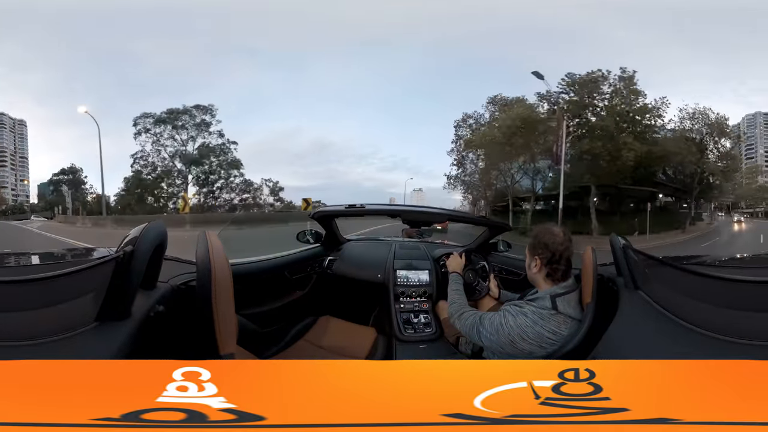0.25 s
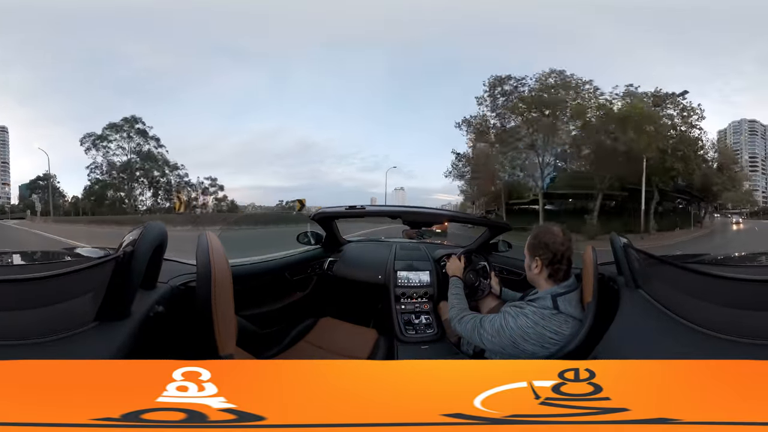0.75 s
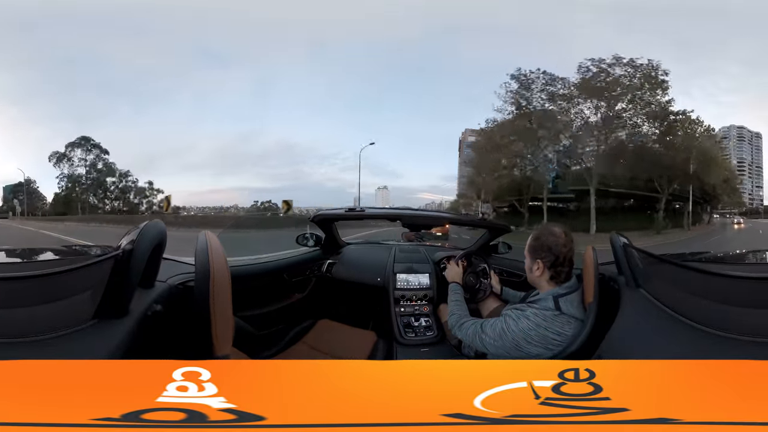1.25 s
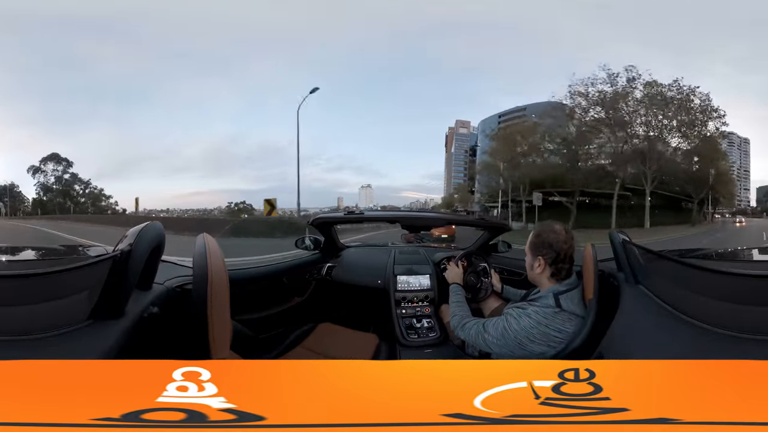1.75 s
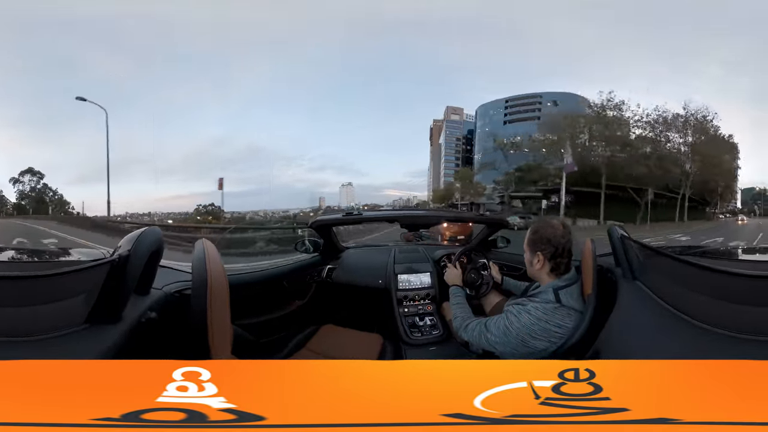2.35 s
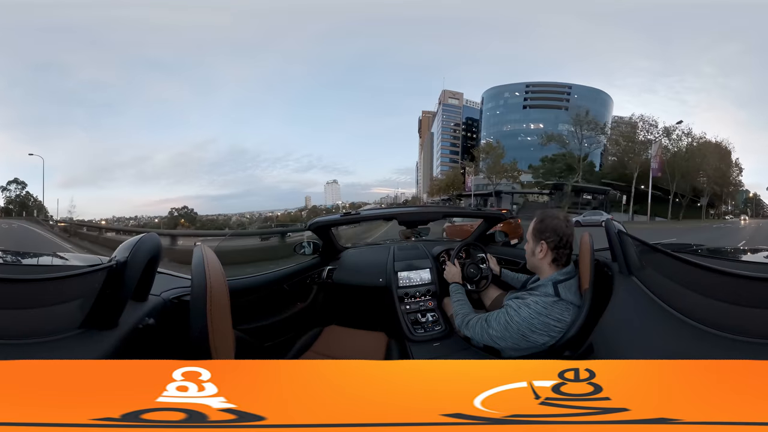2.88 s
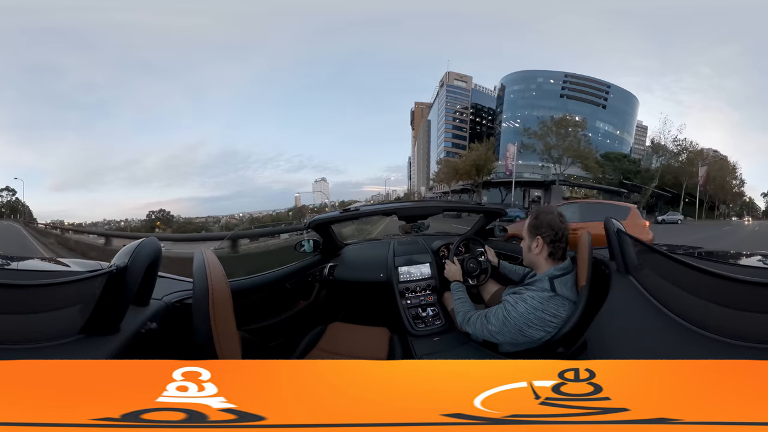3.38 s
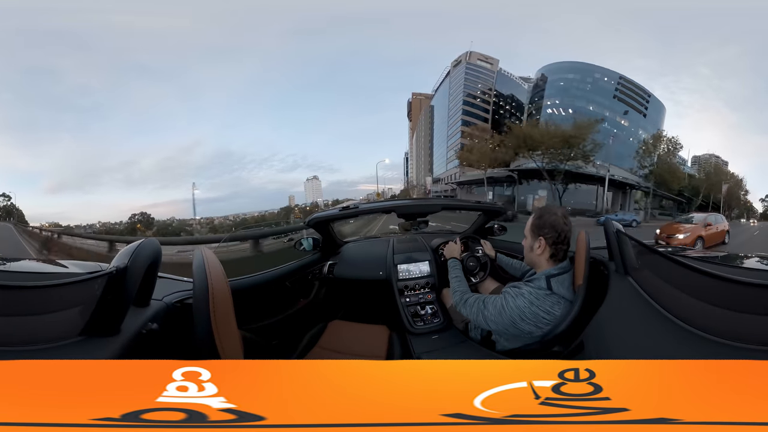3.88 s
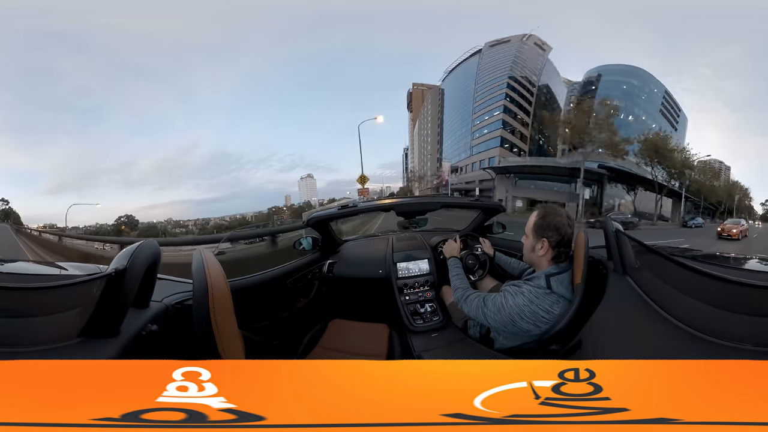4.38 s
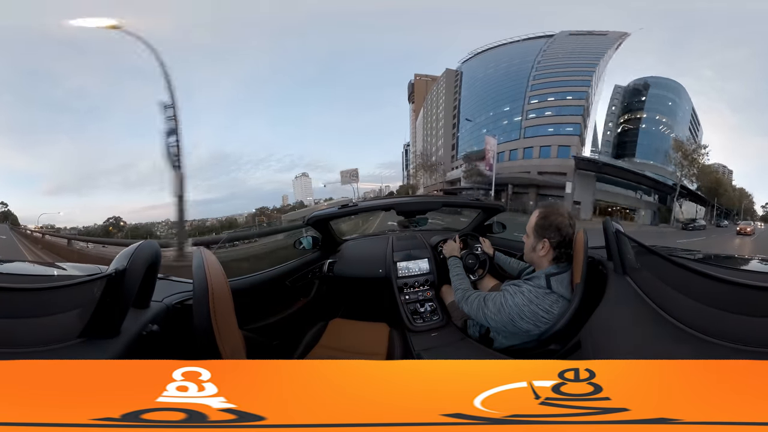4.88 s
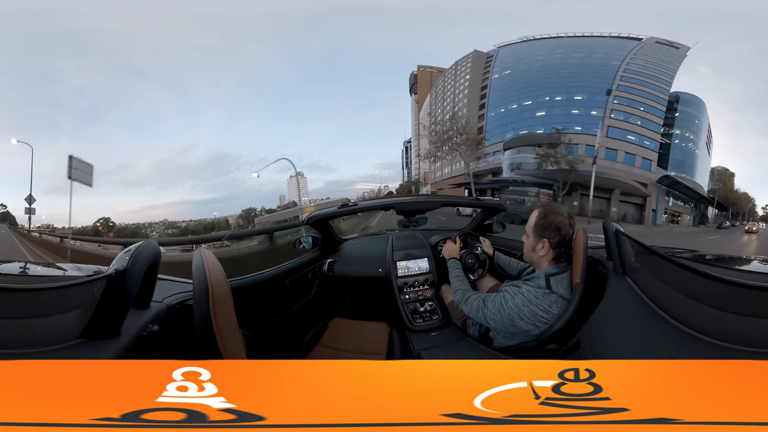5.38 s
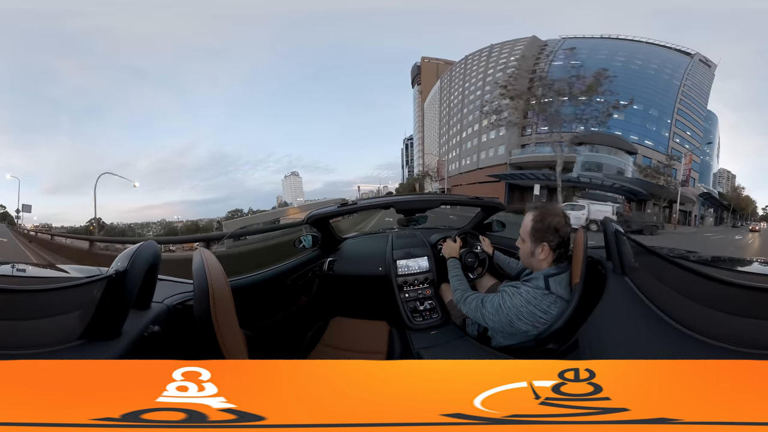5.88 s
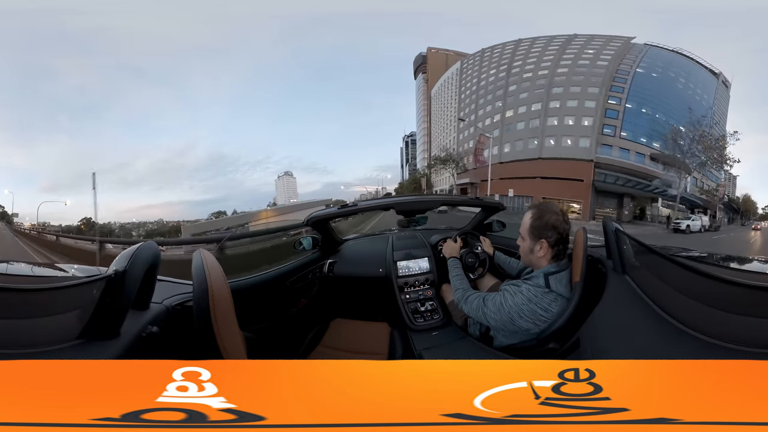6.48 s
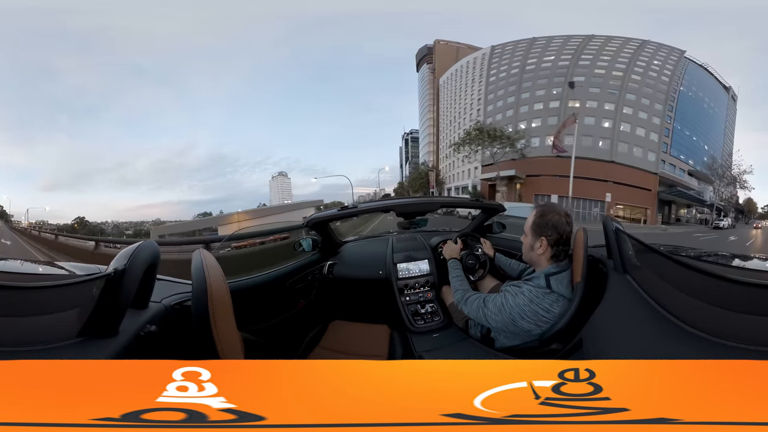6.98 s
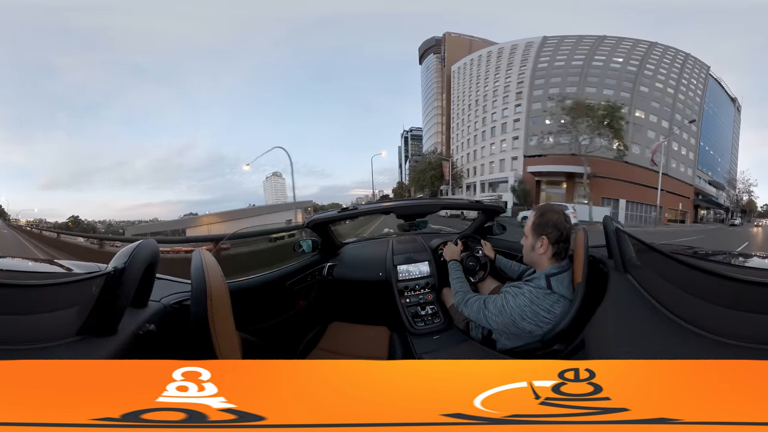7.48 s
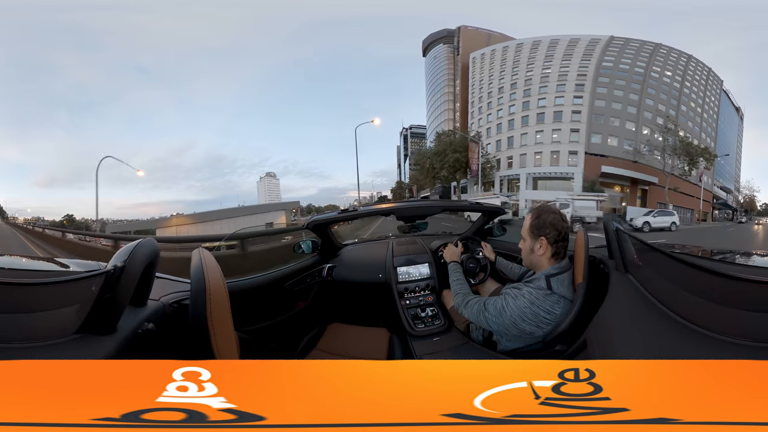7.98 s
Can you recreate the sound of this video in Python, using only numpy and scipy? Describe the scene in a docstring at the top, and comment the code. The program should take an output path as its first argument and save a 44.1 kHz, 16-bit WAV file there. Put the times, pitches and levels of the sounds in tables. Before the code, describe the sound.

An open-top V8 sports car eases off, pulls lightly, then hard with sharp exhaust cracks, lifts with dull pops, and coasts in buffeting wind.

```python
"""Wind buffets the microphone while a V8 roadster, top down, eases off, with thin cabin squeaks and ticks.
Then a light pull, a hard pull ending in sharp exhaust cracks, a lift with pops through an upshift, a long coast.
Engine: sines at firing orders, firing pulses ringing the pipe, and gas noise puffed by each firing.
Cracks and pops: impulses into exhaust resonances. Wind, tyres and body: shaped noise, the slow lumps clipping."""
import sys
import numpy as np
from scipy import signal
from scipy.fft import rfft, irfft, next_fast_len
from scipy.io import wavfile
from scipy.ndimage import uniform_filter1d, map_coordinates

SR = 44100
rng = np.random.default_rng(int(sys.argv[2]) if len(sys.argv) > 2 else 0)


def store_pcm(level_fs):
    """Save levels as 16-bit WAV."""
    pcm = np.round(np.clip(level_fs, -1, 1) * 32767).astype(np.int16)
    wavfile.write(sys.argv[1], SR, np.atleast_2d(pcm).T)


N = 363384

# engine speed: (time [s], firing rate [Hz])
FIRING_RATE = [(0, 140), (.3, 123.1), (.7, 117.6), (1.0, 124), (1.75, 129.7), (2.05, 139), (2.6, 152.4),
               (2.8, 159.9), (3.45, 181.5), (3.7, 188.2), (4.07, 187.3), (4.25, 173.4), (4.55, 140.7),
               (5.0, 138.2), (5.9, 125.9), (6.5, 117.6), (7.4, 108), (8.24, 102.9)]
# engine load: (time [s], firing tone [dB], pipe bark [dB], gas rasp before offsets [dB])
ENGINE_LOAD = [(0, -39, -36.5, -48), (.7, -44, -44, -60), (1.0, -26, -35.5, -49.5), (1.3, -24.5, -34, -41),
               (1.6, -27.5, -34.5, -43.5), (1.87, -36.5, -43, -59.5), (2.15, -25.5, -34, -40),
               (2.6, -23.5, -39.5, -33.5), (2.72, -22.5, -45, -27.5), (3.3, -21.5, -32, -26.5),
               (3.55, -20.5, -20.5, -20), (3.77, -18, -17, -21), (3.92, -23.5, -25.5, -51),
               (4.07, -27.5, -30, -67), (4.18, -38.5, -26.5, -57), (4.45, -39, -29, -60),
               (4.7, -28, -31.5, -53), (5.3, -32.5, -31, -52), (5.8, -33, -45.5, -52),
               (8.24, -24.5, -55, -51.5)]
# tones beside the firing tone: (time [s], 3/4 rate [dB], 5/4 rate [dB], 7/4 rate [dB], 2x rate [dB])
SIDE_TONES = [(0, -48, -50, -29, -22.5), (.2, -41, -59, -41, -39), (2.0, -42.5, -59, -48, -37.5),
              (2.25, -29.5, -50, -38, -36.5), (3.4, -32.5, -46, -36.5, -36.5), (3.7, -43, -40, -28, -25.5),
              (4.1, -46, -54, -55, -35.5), (4.45, -41, -42, -57, -34), (4.8, -31.5, -31.5, -53, -53),
              (5.7, -29, -51, -36, -40), (6.9, -36.5, -50, -43, -46), (8.24, -46, -53, -51, -42)]
# tailpipe pulse strength by cylinder in firing order, pulling: (relative level [dB])
PULLING_DB = [0, -1, -4, -3, -.5, -4, -2, -4]
# same, coasting: (relative level [dB])
COASTING_DB = [3.5, -5.5, -2, -7.5, 0, -1.5, -8, -3.5]
# cylinder bank in firing order: (bank [0 or 1])
BANK = [0, 1, 0, 0, 1, 0, 1, 1]
# exhaust resonances, bypass valve open: (centre [Hz], width [Hz], relative level [dB])
OPEN_PIPE = [(330, 9.3, -22.5), (467, 150, -1), (556.3, 23, 3.5), (656, 47, 3), (739, 40, 4)]
# exhaust resonances, bypass valve shut: (centre [Hz], width [Hz], relative level [dB])
SILENCER = [(191.4, 13, 3), (262, 190, -10), (456, 40, 2.5), (619, 65, 2.5), (895, 51, -4)]
# tailpipe tip resonances: (centre [Hz], width [Hz], relative level [dB])
TIPS = [(1600, 28, 11), (2190, 29, 1), (2370, 41, 0), (3350, 660, -2.5), (5510, 166, -6), (7500, 470, -40)]
# turbulent exhaust gas spectrum: (frequency [Hz], relative density [dB per Hz])
GAS_SPECTRUM = [(150, -39), (250, -38), (282, -23), (427, -9), (705, 2.5), (997, -4.5), (1340, -0.5),
                (2250, -8.5), (3010, -5.5), (4410, -14), (5520, -18.5), (7800, -25.5), (9110, -35.5),
                (12400, -38), (15600, -42)]
# crack strength by cylinder in firing order: (relative level [dB])
CRACKING_DB = [0, -3, -60, -60, -3, -60, -60, -60]
# unburnt fuel popping: (time [s], blow before pipe gain [dB], snap relative to blow [dB])
POPS = [(4.217, -16, -16), (4.25, -4.5, -8.5), (4.263, -3.5, -25), (4.292, -11, -22), (4.313, -11, -23),
        (4.327, -11, -25), (4.345, -6.5, -28), (4.366, -4.5, -24), (4.386, -16, -25), (4.42, -10, -13),
        (4.457, -11, -22), (4.477, -10.5, -13), (4.563, -19, -20), (4.599, -18, -20), (4.637, -17, -27),
        (4.694, -12, -15)]
# exhaust resonances under a pop: (centre [Hz], width [Hz], relative level [dB])
POP_RING = [(200, 200, -5.5), (450, 34, 6.5), (702, 86, 6.5)]
# cabin ticks: (time [s], noise level at onset before high-pass [dB])
TICKS = [(0.2139, -50.5), (0.7248, -49), (2.0198, -44.5), (4.7082, -60), (5.1094, -53)]
# faint squeaks: (time [s], length [s], start [Hz], end [Hz], peak [dB])
SQUEAKS = [(0.371, 0.018, 3270, 3584, -47), (0.382, 0.034, 4400, 4650, -50), (0.414, .02, 4450, 4400, -53),
           (.45, .03, 3710, 3350, -53), (0.51, 0.019, 3650, 3800, -54)]
# wind buffeting, before short rises and dips: (time [s], level [dB])
WIND = [(0, -26), (1.2, -26), (1.8, -27), (2.4, -21.5), (3.4, -19), (4.1, -16.5), (4.8, -14.5),
        (5.9, -18.5), (6.5, -19), (8.24, -21.5)]
# short rises and dips of the buffeting level: (centre time [s], half length [s], change [dB])
BUFFET_SWELLS = [(0.42, 0.036, 5.5), (0.618, 0.075, 4.5), (1.31, 0.09, 8), (1.677, 0.12, 12),
                 (1.82, 0.062, -15), (2.573, .06, -19), (2.69, 0.14, 13), (2.952, 0.065, 15),
                 (3.205, 0.24, 8.5), (4.426, 0.083, -7), (5.6, 0.083, 6), (5.987, .12, 7.5),
                 (6.268, 0.077, -16), (6.35, 0.06, 8.5), (7.464, 0.051, 3), (7.893, .06, 12),
                 (8.028, 0.091, 8.5)]
# road noise: (time [s], tyre and air rush [dB], body rumble [dB])
ROAD = [(0, -35, -52.5), (1.3, -30, -30), (1.9, -33.5, -40.5), (2.6, -26, -36.5), (3.6, -25, -32.5),
        (4.2, -30.5, -35.5), (5.8, -27.5, -39), (8.24, -31.5, -36.5)]
# buffeting spectrum: (frequency [Hz], relative density [dB per Hz])
BUFFET_SPECTRUM = [(2.9, -10.5), (5.0, -0.5), (27, 2.5), (64, -12), (113, -23.5), (156, -45), (200, -20.5),
                   (260, -35.5), (440, -120)]
# body rumble spectrum: (frequency [Hz], relative density [dB per Hz])
RUMBLE_SPECTRUM = [(40, 14.5), (70, 4.5), (110, -1.5), (160, -1.5), (270, -5.5), (400, -9), (650, -47.5)]
# tyre and air rush spectrum: (frequency [Hz], relative density [dB per Hz])
RUSH_SPECTRUM = [(150, -5.5), (280, -4), (400, -9), (650, -10), (800, -10), (920, -8), (1050, -12),
                 (1750, -13.5), (2000, -20.5), (3400, -29.5), (4400, -38.5), (5600, -39.5), (6500, -46),
                 (7800, -46), (9000, -64), (15600, -98)]

CYLINDERS = len(PULLING_DB)
FIRST_CYLINDER_S = 3.6352  # a firing of the first cylinder
# cracks: time window, peak time, level before gains, fade either side of the peak, random scatter
CRACK_FROM_S, CRACK_TO_S, CRACK_PEAK_S = 3.585, 3.775, 3.66
CRACK_DB, CRACK_FADE_DB_PER_S, CRACK_SCATTER_DB = -21, 40, 2
# inverted echo off a near panel, notching the treble
ECHO_S, ECHO_SHARE, ECHO_FROM_HZ = 0.000456, 0.29, 2500
BAND_LIMIT_HZ = 15725


def crankshaft():
    """Slightly unsteady rotation: firing rate, and firings counted in phase with the first cylinder."""
    rate_hz, = curves(FIRING_RATE)
    fired = np.cumsum(rate_hz * (1 + .0015 * wobble(12))) / SR
    return rate_hz, fired - fired[round(FIRST_CYLINDER_S * SR)] % CYLINDERS


def firing_tones(fired, cut):
    """Low orders of the cycle boom as sines; the double tone fades with the fuel cut."""
    tone_db = curves(ENGINE_LOAD)[0]
    lope_db, five_db, seven_db, double_db = curves(SIDE_TONES)
    cycle_rad = 2 * np.pi * fired / CYLINDERS

    def tone(order, db):
        return np.sqrt(2) * amp(db + 0.7 * wobble(19)) * np.sin(order * cycle_rad)

    boom = tone(order=8, db=tone_db) + tone(order=6, db=lope_db)
    boom += (1 - cut) * tone(order=16, db=double_db)
    return boom + tone(order=10, db=five_db) + tone(order=14, db=seven_db)


def firing_pulses(fired, throttle, valve, cut):
    """One impulse per firing, uneven in size and timing; also a copy with the banks opposed when coasting."""
    at = firings(fired)
    cylinder = cylinder_at(fired, at)
    bank = np.take(BANK, cylinder)
    even = np.maximum(throttle, valve)[at]
    lift = ((1 - throttle) * valve)[at]  # throttle shut at high revs
    chance = rng.standard_normal((len(at), 2))
    size_db = even * np.take(PULLING_DB, cylinder) + (1 - even) * np.take(COASTING_DB, cylinder)
    size = amp(size_db + (1 + 2 * lift + 3 * cut[at]) * chance[:, 1])
    # combustion never repeats exactly, least with the fuel cut
    late_s = (.00004 + .0003 * lift + .0015 * cut[at]) * chance[:, 0]
    late_s = late_s + 0.00033 * bank - .0008  # bank 1 has the longer pipe
    when = np.clip(at + np.round(SR * late_s).astype(int), 0, N - 1)
    pulses = np.bincount(when, size, N)
    opposed = np.bincount(when, size * (1 - 2 * bank * (1 - even)), N)
    return pulses, opposed


def pipe_bark(pulses, opposed, valve):
    """Pulses ring the open pipe at high revs, the silencer at low revs."""
    loud = steady(resonant(muffled(pulses, hz_top=2500), OPEN_PIPE))
    quiet = steady(resonant(muffled(opposed, hz_top=1800), SILENCER))
    return valve * loud + (1 - valve) * quiet


def exhaust_gas(pulses, bark_db, rasp_db):
    """Turbulent hiss puffed by each firing, plus ringing tips and bare pressure peaks, with a panel echo."""
    t = np.arange(SR // 50) / SR
    puffs = signal.fftconvolve(pulses, np.exp(-t / .002))[:N]
    hiss = coloured(patchy(patchy_db=1.2) * (.45 + puffs), GAS_SPECTRUM)
    fronts = 6 * pulses + puffs * rng.standard_normal(N)
    tips = muffled(resonant(fronts, TIPS), hz_top=12000)
    ring = steady(muffled(tips, hz_top=12000))
    spike = muffled(pulses, hz_top=3970) - muffled(pulses, hz_top=900)  # pressure peak
    ring += 1.1 * steady(muffled(spike, hz_top=9000))
    # strong pulses: ring takes over from hiss
    ring_db = 1.234 * bark_db + 0.63 * rasp_db + 11.5
    hiss_db = rasp_db + 3.5 - .4 * np.maximum(bark_db + 27, 0)

    def panel_echo(hz):
        share = ECHO_SHARE * hz ** 2 / (hz ** 2 + ECHO_FROM_HZ ** 2)
        return 1 - share * np.exp(-2j * np.pi * hz * ECHO_S)

    return filtered(amp(hiss_db) * hiss + amp(ring_db) * ring, panel_echo)


def engine(rate_hz, fired):
    """Low orders boom; each firing barks through the pipe and puffs gas noise."""
    tone_db, bark_db, rasp_db = curves(ENGINE_LOAD)
    throttle = np.clip((rasp_db + 46) / 5, 0, 1)  # open throttle shows as gas flow
    valve = np.clip((rate_hz - 146) / 8, 0, 1)  # bypass opens at high revs
    cut = np.clip((bark_db - tone_db - 4) / 5, 0, 1) * valve  # fuel cut
    boom = firing_tones(fired, cut)
    pulses, opposed = firing_pulses(fired, throttle, valve, cut)
    bark = amp(bark_db) * pipe_bark(pulses, opposed, valve)
    return boom + bark + exhaust_gas(pulses, bark_db, rasp_db)


def cracks(fired):
    """Three cylinders crack once a cycle: steep fronts with a short spit of noise ring the tips."""
    front = np.zeros(N)
    t = np.arange(SR // 40) / SR
    at = firings(fired)
    at = at[(at > CRACK_FROM_S * SR) & (at < CRACK_TO_S * SR)]
    crack_db = CRACK_DB + np.take(CRACKING_DB, cylinder_at(fired, at))
    crack_db = crack_db - CRACK_FADE_DB_PER_S * np.abs(at / SR - CRACK_PEAK_S)
    crack_db = crack_db + CRACK_SCATTER_DB * rng.standard_normal(len(at))
    for s, db in zip(at / SR, crack_db):
        spit = 0.41 * amp(-60 * t / 0.0026) * rng.standard_normal(len(t))
        add_at(front, s, amp(db) * (spit + (t == 0)))
    return amp(13) * muffled(front, hz_top=13000) + amp(40) * resonant(front, TIPS)


def pops():
    """Dull blows of unburnt fuel ring the whole pipe, each with a decaying 1500 Hz snap."""
    blow, snap = np.zeros(N), np.zeros(N)
    t = np.arange(SR // 40) / SR
    for s, db, snap_db in POPS:
        blow[round(s * SR)] = amp(db)
        add_at(snap, s, amp(db + snap_db - 60 * t / 0.023) * np.sin(2 * np.pi * 1500 * t))
    return amp(31) * resonant(muffled(blow, hz_top=1110), POP_RING) + muffled(snap, hz_top=3000)


def ticks():
    """Bright ticks: noise bursts falling 60 dB in 20 ms, high-passed."""
    out, t = np.zeros(N), np.arange(SR // 25) / SR
    for s, db in TICKS:
        add_at(out, s, amp(db - 60 * t / 0.02) * rng.standard_normal(len(t)))
    return filtered(out, lambda hz: (hz / 7000) ** 4 / (1 + (hz / 7000) ** 4))


def squeaks():
    """Thin squeaks: gliding sines under half-sine envelopes."""
    out = np.zeros(N)
    for s, length_s, start_hz, end_hz, db in SQUEAKS:
        u = np.arange(round(length_s * SR)) / (length_s * SR)
        glide = np.cumsum(start_hz + (end_hz - start_hz) * u) / SR
        add_at(out, s, amp(db) * np.sin(np.pi * u) * np.sin(2 * np.pi * glide))
    return out


def airflow():
    """Tyres, air and body noise ride on slow pressure lumps that flatten the diaphragm at their peaks."""
    t = np.arange(N) / SR
    wind_db, = curves(WIND)
    swells = [db * np.clip(1 - np.abs(t - s) / half_s, 0, 1) for s, half_s, db in BUFFET_SWELLS]
    wind_db = wind_db + sum(swells)
    rush_db, rumble_db = curves(ROAD)
    lumps = amp(1.8 * wobble(6.4)) * coloured(rng.standard_normal(N), BUFFET_SPECTRUM)
    buffet = amp(wind_db) * unit(lumps)
    rush = amp(rush_db + 0.4 * wobble(6)) * coloured(patchy(patchy_db=0.5), RUSH_SPECTRUM)
    rumble = amp(rumble_db + 1.2 * wobble(7)) * coloured(patchy(patchy_db=1.5), RUMBLE_SPECTRUM)
    panel = [(274, 24, 0)]  # humming body panel: (centre [Hz], width [Hz], level [dB])
    hum = unit(resonant(resonant(rng.standard_normal(N), panel), panel))
    rumble += amp(rumble_db - 6) * hum
    x = buffet + rumble + .5 * rush
    return x / (1 + np.abs(x / .33) ** 5) ** (1 / 5) + .5 * rush  # half the rush escapes flattening


def amp(db):
    """Decibels to gain."""
    return 10 ** (np.asarray(db) / 20)


def unit(x):
    """Scaled to rms 1."""
    return x / np.sqrt(np.mean(x ** 2) + 1e-20)


def curves(rows):
    """One value per sample for each column after the time."""
    s, *cols = np.transpose(rows)
    return [np.interp(np.arange(N) / SR, s, c) for c in cols]


def wobble(rate_hz):
    """A smooth random curve, rate_hz knots a second."""
    knots = rng.standard_normal(int(N * rate_hz / SR) + 4)
    return map_coordinates(knots, [np.arange(N) * rate_hz / SR])


def add_at(track, s, x):
    """Adds x into track from time s."""
    track[round(s * SR):][:len(x)] += x


def firings(fired):
    """Sample indices just before each firing."""
    return np.flatnonzero(np.diff(np.floor(fired)))


def cylinder_at(fired, at):
    """Place in the firing order of each firing."""
    return np.floor(fired[at] + 1).astype(int) % CYLINDERS


def filtered(x, response):
    """x times a complex response of frequency."""
    m = next_fast_len(N + SR // 2)
    return irfft(rfft(x, m) * response(np.fft.rfftfreq(m, 1 / SR)), m)[:N]


def coloured(x, spectrum):
    """x shaped by (frequency [Hz], level [dB]) points on a log axis, rms 1."""
    f, db = np.transpose(spectrum)
    return unit(filtered(x, lambda hz: amp(np.interp(np.log(hz + 1), np.log(f + 1), db))))


def patchy(patchy_db):
    """White noise with time-frequency patches of random gain, patchy_db rms."""
    z = signal.stft(rng.standard_normal(N), nperseg=512)[2]
    field = uniform_filter1d(rng.standard_normal(z.shape), 6, 0)
    field = uniform_filter1d(field, 10, 1)
    return signal.istft(z * amp(patchy_db * unit(field)), nperseg=512)[1][:N]


def resonant(x, modes):
    """x through causal (centre [Hz], width [Hz], level [dB]) resonances of alternating sign."""
    def peak(hz, c, w):
        return 1j * hz * w / (c * c - hz * hz + 1j * hz * w)

    def response(hz):
        return sum((-1) ** k * amp(db) * peak(hz, c, w) for k, (c, w, db) in enumerate(modes))

    return filtered(x, response)


def steady(x):
    """Slow level divided out over 0.25 s."""
    return x / np.sqrt(np.abs(uniform_filter1d(x ** 2, SR // 4)) + 1e-12)


def muffled(x, hz_top):
    """A causal third-order low-pass."""
    return filtered(x, lambda hz: 1 / (1 + 1j * hz / hz_top) ** 3)


def scene():
    """Everything at one microphone."""
    rate_hz, fired = crankshaft()
    exhaust_bangs = cracks(fired) + pops()
    cabin = ticks() + squeaks()
    return (engine(rate_hz, fired) + exhaust_bangs + cabin + airflow())[None]


def record(dry):
    """Peaks saturate softly; nothing passes above the band limit."""
    x = dry[0] / (1 + np.abs(dry[0] / .88) ** 8) ** (1 / 8)
    return filtered(x, lambda hz: hz < BAND_LIMIT_HZ)[None]


dry = scene()
out = record(dry)
store_pcm(out)
```